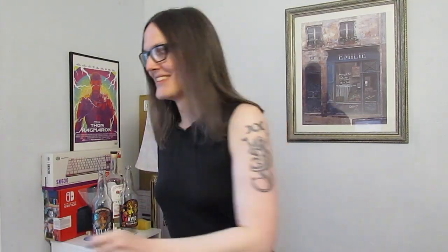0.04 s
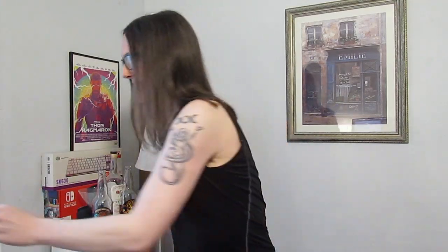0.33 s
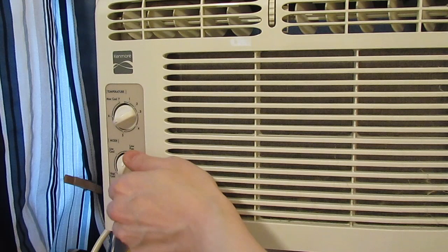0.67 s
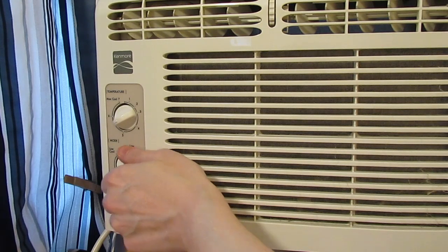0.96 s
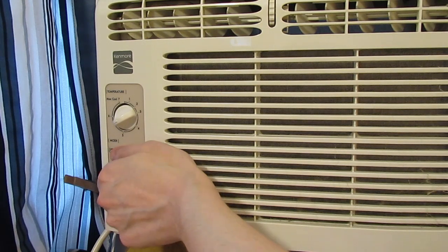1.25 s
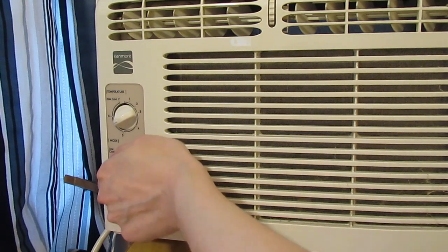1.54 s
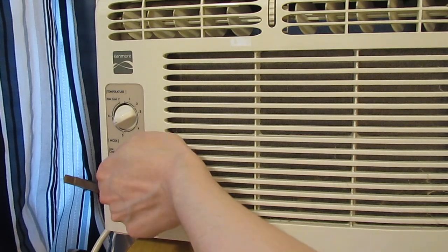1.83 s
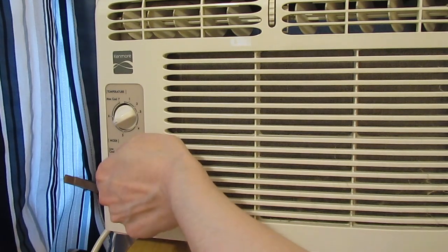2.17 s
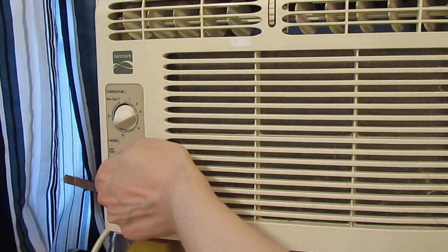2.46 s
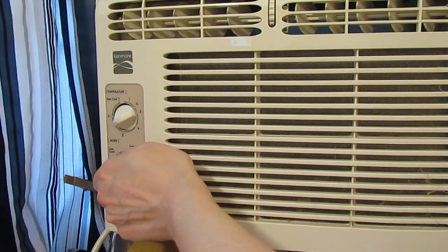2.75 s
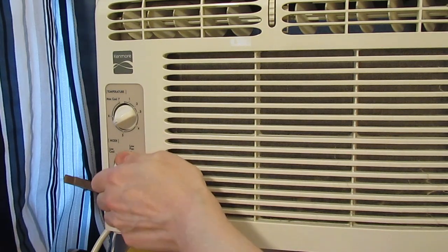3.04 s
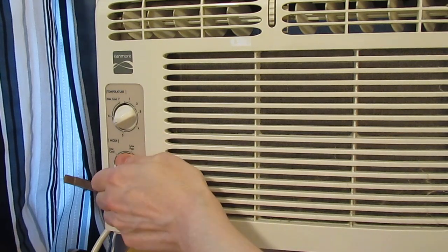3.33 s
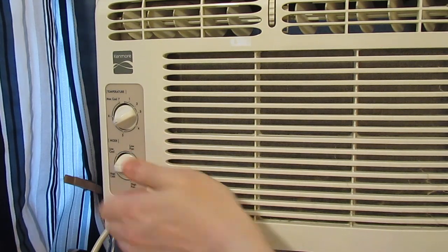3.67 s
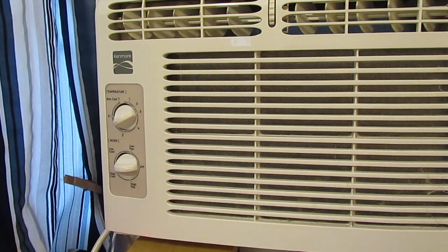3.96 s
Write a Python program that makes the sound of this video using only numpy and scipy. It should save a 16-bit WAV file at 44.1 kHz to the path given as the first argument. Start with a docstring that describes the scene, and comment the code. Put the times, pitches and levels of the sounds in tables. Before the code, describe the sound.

Air conditioner running with rushing air, until a loud switch snap lets its fan slow.

```python
"""Window air conditioner switched off

Turbulent air, a blade-passing tone and mains hum fill a small room; fingers rub and tick on a knob.
The rotary switch snaps over, and its impacts ring the plastic cabinet and overload the microphone.
The hum dies away, the fan coasts down through a cabinet resonance and the rush of air fades."""
import sys
import numpy as np
from scipy import signal
from scipy.fft import rfft, irfft
from scipy.io import wavfile
from scipy.ndimage import uniform_filter1d

SR = 44100
rng = np.random.default_rng(int(sys.argv[2]) if len(sys.argv) > 2 else 0)


def to_wav(sig):
    """Store sig (one row per channel, or 1-D mono) as 16-bit WAV at the path in sys.argv[1].

    Samples outside -1..1 are clipped; the rate is SR.
    """
    pcm = np.clip(np.atleast_2d(sig), -1, 1) * 32767
    pcm = np.round(pcm).astype(np.int16)
    wavfile.write(sys.argv[1], SR, pcm.T)  # frames by channels


N = 176400
T = np.arange(N) / SR
FREQ_HZ = np.fft.rfftfreq(N, 1 / SR)
POWER_OFF_S, IMPACT_ATTACK_S = 2.7, 0.00038


def undb(db):
    """Amplitude ratio of a level in decibels."""
    return 10 ** (np.asarray(db) / 20)


def at_freq(points, hz):
    """Interpolation of (frequency, value) points on a logarithmic frequency axis."""
    known_hz, values = np.array(points, float).T
    return np.interp(np.log(np.maximum(hz, 1)), np.log(known_hz), values)


def noise(spectrum):
    """Spectral shaping: white noise filtered to the given relative levels, at unit rms."""
    shaped = irfft(rfft(rng.standard_normal(N)) * undb(at_freq(spectrum, FREQ_HZ)), N)
    return shaped / shaped.std()


def wide_noise(spectrum, side_db):
    """Decorrelation: a side noise of opposite sign in each channel gives stereo width."""
    return noise(spectrum) + undb(side_db) * noise(spectrum) * np.array([[1], [-1]])


def wander(rate_hz):
    """Slow random modulation: smoothed steps with zero mean and unit variance."""
    hold = max(int(SR / rate_hz), 1)
    steps = rng.standard_normal(N)[np.arange(N) // hold]
    smooth = uniform_filter1d(uniform_filter1d(steps, hold), hold)
    return (smooth - smooth.mean()) / smooth.std()


def tone(phase, rms_db):
    """A sinusoid with a random starting phase."""
    return np.sqrt(2) * undb(rms_db) * np.sin(phase + rng.uniform(0, 2 * np.pi))


def strike(start_s, attack_s, decay_s):
    """Envelope of a damped transient: linear rise, exponential decay."""
    age = np.maximum(T - start_s, 0)
    return np.minimum(age / attack_s, 1) * np.exp(-np.maximum(age - attack_s, 0) / decay_s)


# Blade tone as the cabinet resonates with it: time_s, level_db
BLADE_LEVELS = [(0, -17), (2.78, -17), (2.85, -13.5), (2.96, -14), (3.12, -17.5), (3.23, -17.5),
                (3.3, -12.5), (3.37, -10.5), (3.53, -12.5), (3.58, -16), (3.64, -32), (3.72, -17),
                (3.8, -26), (3.93, -23), (4, -19.5)]
# Weaker shaft harmonics at full speed: harmonic_number, level_db, unsteadiness_ratio
SHAFT_HARMONICS = [(2, -28, 0.1), (8, -30.5, 0.09), (22, -40, 0.29)]

def fan(speed, angle, blades=4):
    """Periodic forcing: blades pulse the air at multiples of the shaft rate, so pitch follows speed."""
    blade_db = np.interp(T, *np.array(BLADE_LEVELS).T)
    out = tone(blades * angle, blade_db) * (1 + 0.047 * wander(8.04))
    for harmonic, level_db, unsteadiness in SHAFT_HARMONICS:
        partial = tone(harmonic * angle + unsteadiness * wander(5), level_db)
        out += partial * (1 + unsteadiness * wander(5.14)) * speed ** 3
    return out


# Mains hum partials: pitch_hz, level_db
HUM_PARTIALS = [(120, -23.5), (240, -27)]

def motor(release_s=0.094):
    """Magnetic forces vibrate the motor at even multiples of the mains frequency until power is cut."""
    envelope = np.exp(-np.maximum(T - POWER_OFF_S, 0) / release_s)
    hum = sum(tone(2 * np.pi * hz * T, db) * (1 + 0.36 * wander(5.9)) for hz, db in HUM_PARTIALS)
    return envelope * hum


# Air through the grille at full speed: frequency_hz, relative_level_db
AIR_SPECTRUM = [(100, -2), (165, -5), (220, 1), (260, -6), (310, -6), (350, -5.5), (395, -1.5), (470, -8),
                (570, -10), (680, -14), (790, -14), (860, -10.5), (950, -13), (1170, -11), (1350, -17.5),
                (1480, -23.5), (1560, -23), (1850, -36), (2100, -33), (2700, -32), (3100, -37), (3500, -35),
                (4200, -38), (4550, -43.5), (4900, -40.5), (5500, -46.5), (7000, -46.5), (9000, -48.5),
                (10200, -56.5), (12000, -62), (15500, -72)]
# Loss of air noise as the fan slows: frequency_hz, loss_db_per_speed_halving
AIR_LOSS = [(100, 19), (250, 18.5), (400, 17.5), (1000, 20.5), (3000, 21), (10000, 29)]

def air(speed, angle, level_db=-18, flutter_db=0.4, swell_db=0.43):
    """Turbulence noise weakens with flow speed, treble fastest; each octave flutters independently."""
    spectrum = rfft(noise([(30, -15)] + list(AIR_SPECTRUM)))
    octave = np.clip(np.log2(np.maximum(FREQ_HZ, 1) / 100), 0, 7)
    out = 0
    for k in range(8):
        band = irfft(spectrum * np.maximum(1 - abs(octave - k), 0), N)
        slowing_db = at_freq(AIR_LOSS, 100 * 2 ** k) * np.log2(speed)
        out += band * undb(slowing_db + flutter_db * wander(18))
    return out * undb(level_db + swell_db * np.sin(angle))  # one swell per turn


# Low buffeting: frequency_hz, relative_level_db
RUMBLE_SPECTRUM = [(8, 2), (19, 30), (30, 9), (45, 23), (58, 16.5), (74, 19), (88, 11.5), (120, -42)]
# Steady hiss: frequency_hz, relative_level_db
HISS_SPECTRUM = [(100, 8), (500, 6), (2000, 1), (5000, -2), (7000, -1.5), (8700, -.5), (10000, -4),
                 (11500, -8.5), (13000, -11), (15500, -13.5)]

def background():
    """Stationary noise: a floor of rumble and hiss, independent of fan speed."""
    return undb(-24.5) * noise(RUMBLE_SPECTRUM) + undb(-53.5) * noise(HISS_SPECTRUM)


# Finger slides on the knob: centre_s, half_length_s, level_db
SLIDES = [(1.35, .03, -51.5), (1.36, .2, -57)]
# Skin rubbing on plastic: frequency_hz, relative_level_db
SLIDE_SPECTRUM = [(2000, -8), (6000, 0), (9000, 1), (12000, -4), (15500, -7)]
# Ticks of the knob: start_s, level_db
KNOB_TICKS = [(0.883, -38), (3.0006, -37), (3.0919, -43), (3.122, -36.5)]
# Colour of a tick: frequency_hz, relative_level_db
TICK_SPECTRUM = [(1000, -10), (4000, -5), (7000, 4), (11000, 1), (15500, -12)]

def fingers(grain_db=2, tick_decay_s=0.0022):
    """Friction of dry skin makes grainy noise; small impacts tick as the knob moves in its play."""
    slides = sum(undb(db) * np.exp(-((T - centre) / half) ** 2) for centre, half, db in SLIDES)
    ticks = sum(undb(db) * strike(start, IMPACT_ATTACK_S, tick_decay_s) for start, db in KNOB_TICKS)
    grain = undb(grain_db * wander(150))
    return slides * grain * noise(SLIDE_SPECTRUM) + ticks * noise(TICK_SPECTRUM)


# Switch contacts, two strong and one faint: start_s, crack_db, decay_s, cabinet_blow_db
CONTACTS = [(2.7964, -10.5, 0.0047, -9), (2.8097, 5, .0015, 2), (2.829, -26, .003, -25)]
# Crack of a contact: frequency_hz, relative_level_db
CRACK_SPECTRUM = [(400, -12), (1200, -4), (2200, 5), (2800, -4.5), (4300, 0.5), (5100, -4), (6000, 1.5),
                  (7000, -10.5), (8000, 3), (9500, -14), (12000, -4.5), (14000, -20), (16000, -18)]
# Modes of the cabinet front: pitch_hz, relative_level_db, t60_s
CABINET_MODES = [(418.4, -8, 0.15), (565, -5, .075), (680, -6.5, 0.026), (943, -13.5, 0.034),
                 (1068, -10, .07), (1168, -4, 0.032), (1315, -9, 0.049), (1543, -16, 0.066),
                 (1640, -15.5, 0.057), (2210, -19, .05), (3410, -20.5, 0.036), (4580, -18, 0.03)]

def switch(ring_lag_s=0.0012, ring_attack_s=0.0034):
    """Impact excitation: each contact radiates a broadband crack and rings the cabinet's damped modes."""
    out = np.zeros((2, N))
    for start_s, crack_db, decay_s, blow_db in CONTACTS:
        crack = wide_noise(CRACK_SPECTRUM, side_db=-10.5)
        out += undb(crack_db) * crack * strike(start_s, IMPACT_ATTACK_S, decay_s)
        for pitch_hz, mode_db, t60_s in CABINET_MODES:
            ring = strike(start_s + ring_lag_s, ring_attack_s, t60_s / np.log(1000))
            out += undb(blow_db + mode_db) * ring * np.sin(2 * np.pi * pitch_hz * (T - start_s))
    return out


# Reflections in a furnished room: frequency_hz, relative_level_db
ROOM_SPECTRUM = [(200, -4), (1000, 1.5), (2500, 6), (5500, -3), (8000, -4), (9500, -2), (12500, -5),
                 (15000, -7)]

def room(direct, level_db=-20.5, t60_s=0.23, delay_s=0.0055):
    """Reverberation: convolution with decaying noise adds dense reflections to the direct sound."""
    tail = wide_noise(ROOM_SPECTRUM, side_db=-25) * strike(delay_s, delay_s, t60_s / np.log(1000))
    tail /= np.linalg.norm(tail[0])
    return direct + undb(level_db) * signal.fftconvolve(direct, tail, axes=1)[:, :N]


def scene(shaft_hz=23.2, half_speed_after_s=2.3):
    """Superposition of all sources; quadratic air drag slows the fan once the power is cut."""
    coasting_s = np.maximum(T - POWER_OFF_S, 0)
    speed = (1 + 0.0015 * wander(2)) / (1 + coasting_s / half_speed_after_s)  # 1 is full speed
    angle = 2 * np.pi * shaft_hz * np.cumsum(speed) / SR
    noise_floor = background()
    machine = fan(speed, angle) + motor() + air(speed, angle)
    return machine + noise_floor + room(switch() + fingers())


def record(dry, cutoff_hz=15850):
    """Overload and band limiting: the snap clips at full scale, then a low-pass cuts the top treble."""
    low_pass = signal.ellip(10, 0.1, 80, cutoff_hz, fs=SR, output="sos")
    return signal.sosfilt(low_pass, np.clip(dry, -1, 1))


dry = scene()
out = record(dry)
to_wav(out)
```